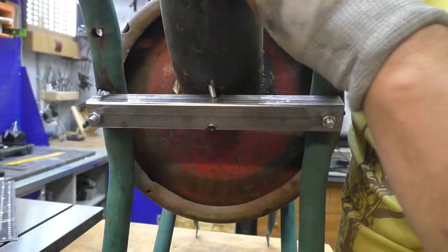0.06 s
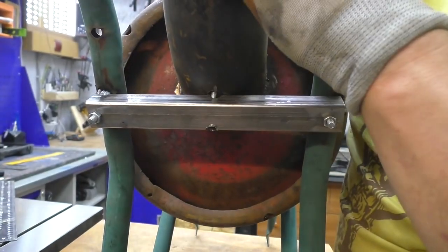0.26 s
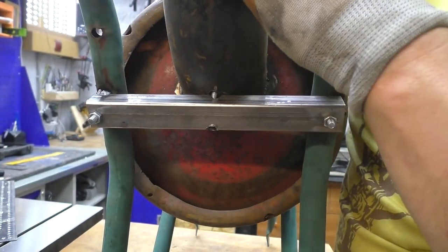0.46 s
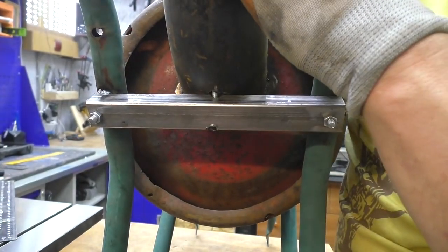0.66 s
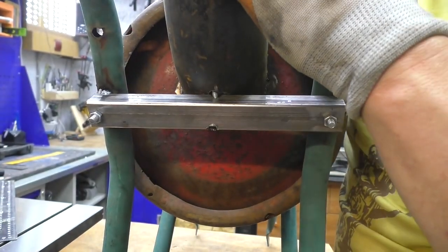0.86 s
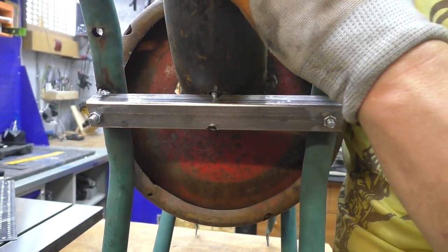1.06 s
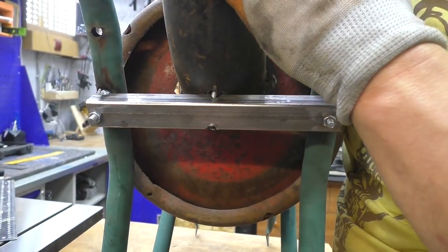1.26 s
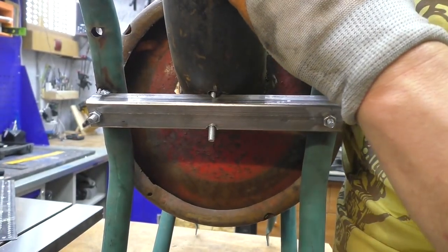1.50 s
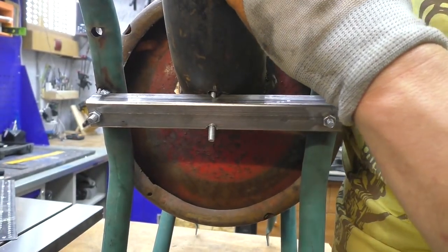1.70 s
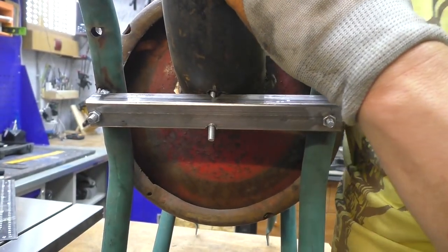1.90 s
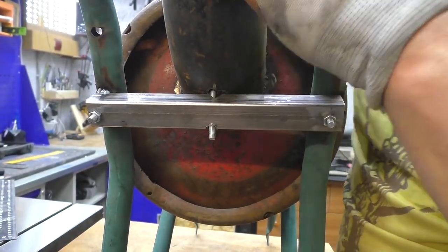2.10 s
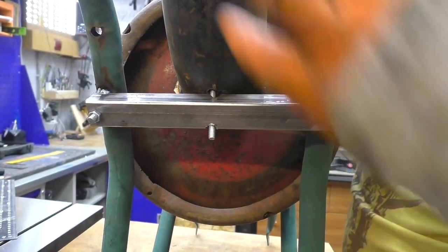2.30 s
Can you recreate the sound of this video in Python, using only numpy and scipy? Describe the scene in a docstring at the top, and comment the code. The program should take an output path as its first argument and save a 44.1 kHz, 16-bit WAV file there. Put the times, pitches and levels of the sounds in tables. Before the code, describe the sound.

Close metal clinking in a workshop: after a few hollow booms from a shifted drum, a steel pin chatters, scrapes and briefly squeaks in a ringing bar, landing with a bright clink. Soft low bumps and glove rustle finish.

```python
"""Low booms, then steel rattling and scraping up to a bright clink, close by in a workshop.
A gloved hand works a steel pin through a bar on a steel frame that holds a large drum.
The drum booms as it is shifted; the pin chatters in its hole, scrapes along it and drops home.
Each contact rings the pin briefly and the bar and frame for longer."""
import sys
import numpy as np
from scipy import signal
from scipy.fft import rfft, irfft, next_fast_len
from scipy.io import wavfile
from scipy.ndimage import uniform_filter1d

SR = 44100
rng = np.random.default_rng(int(sys.argv[2]) if len(sys.argv) > 2 else 0)


def materialize(psi):
    """Save the field psi as 16-bit PCM at rate SR to the path in sys.argv[1].

    A 1-D psi becomes a single channel; in a 2-D psi each row is a channel.
    """
    bounded = np.clip(np.atleast_2d(psi).T, -1, 1)
    quanta = np.round(bounded * 32767).astype(np.int16)
    wavfile.write(sys.argv[1], SR, quanta)


N = 108045
T = np.arange(round(SR * .6)) / SR  # seconds since one event began
BRIEF = T[:len(T) // 6]  # its first 0.1 s
SLIPS_PER_S, CRACK_T60, BOOM_RISE_S = 3000, 0.011, .0035  # a t60 is the seconds taken to fade by 60 dB

# pin contacts: t/s, pin level/dB, frame level/dB, bar level/dB, brightness/(dB per octave),
# chatter time/s, pin's lowest note/Hz, clank boost/dB
CLINKS = [(.199, -31, -42, -47.5, -7, 0.0032, 2530, -7), (0.281, -51, -40, -54, -0.5, 0.0033, 2510, -2),
          (.295, -29, -40, -46, -3, 0.0077, 2600, 3.5), (.462, -45, -52, -51.5, -6.5, 0.0044, 2490, -2.5),
          (.606, -37, -51.5, -53, -7, 0.0021, 3400, 1.5), (.673, -23, -34, -39, -3, 0.0058, 2474, 6),
          (0.9911, -35, -46.5, -52, -6, 0.0014, 2340, -2),
          (1.016, -20.5, -35.5, -42, -1, 0.0047, 2690, 4.5), (1.037, -17.5, -32, -37.5, 1, 0.0067, 2750, 1),
          (1.058, -24.5, -31, -37.5, -1.5, 0.0041, 2560, 3), (1.066, -21, -37, -39, -1, 0.0044, 2780, 5),
          (1.142, -30.5, -43, -39.5, -5, 0.0062, 2720, -1),
          (1.209, -28, -44.5, -48.5, -3.5, .0011, 2535, 1), (1.323, -26, -41.5, -50, -6.5, 0.0065, 2630, 3),
          (1.3327, -13, -35.5, -31, 1.5, 0.0023, 2790, 1), (1.435, -28.5, -31, -43, -2.5, .0045, 2520, -5),
          (1.4858, -19.5, -34, -47, -.5, 0.0028, 3514, 5),
          (1.4903, -16.5, -30.5, -33, -0.5, 0.0042, 2620, 4), (1.535, -33.5, -34, -46, -0.5, .013, 2560, 0),
          (1.63, -32.5, -42, -55, -2.5, 0.007, 2585, 4), (1.657, -35, -45.5, -46, -6, 0.0065, 2590, 4),
          (1.7933, -13.5, -33, -34, 3, 0.0036, 2640, -8.5), (2.019, -45.5, -50, -57, -9.5, .0057, 2560, -7),
          (2.04, -39.5, -46, -74, -7, 0.0031, 2620, 5), (2.202, -45, -49.5, -64, -6.5, 0.0038, 2570, 3.5)]
# the pin sliding in its hole: t/s, length/s, first level/dB, last level/dB
SCRAPES = [(0.197, 0.071, -33, -43.5), (0.687, 0.027, -39, -32), (1.092, 0.064, -42, -34.5),
           (1.284, 0.045, -34.5, -23.5), (1.35, 0.1, -38.5, -48), (1.441, .035, -28, -27.5),
           (1.519, 0.22, -45, -48.5), (2.022, 0.016, -39, -51)]
# the pin's upper modes (notes it rings at by itself): f/Hz, level/dB, t60/s
PIN_MODES = [(3100, -8, .06), (5175, -14, .06), (5710, -1.5, .06), (5880, -9, .03), (6330, -9, .08),
             (6530, -10, .06), (7240, -13, .08), (8940, -8, .07), (9040, -7, .05), (9400, -9, .04),
             (10780, -12, .06)]


def amp(db):
    """Turn decibels into a gain."""
    return 10 ** (np.asarray(db) / 20)


def unit(x):
    """Scale x to an average (rms) level of 1."""
    return x / np.sqrt(np.mean(x ** 2) + 1e-20)


def along(points, hz):
    """Read between (f/Hz, value) points on a log-frequency axis."""
    f, v = np.transpose(points)
    return np.interp(np.log(hz + 1), np.log(f + 1), v)


def bell(hz, centre_hz, octaves):
    """A hump of height 1 on a log-frequency axis."""
    return np.exp(-(np.log2((hz + 1) / centre_hz) / octaves) ** 2)


def filtered(x, response):
    """Scale each frequency in x by response(hz)."""
    n = x.shape[-1]
    padded = next_fast_len(n + 2048, True)
    return irfft(rfft(x, padded) * response(np.fft.rfftfreq(padded, 1 / SR)), padded)[..., :n]


def noise(spectrum, size):
    """Noise shaped by (f/Hz, level/dB) points, at an average level of 1."""
    return unit(filtered(rng.standard_normal(size), lambda hz: amp(along(spectrum, hz))))


def wide(spectrum, width, size):
    """Shaped stereo noise; at width 0 both ears hear the same."""
    return noise(spectrum, size) + width * np.array([[1], [-1]]) * noise(spectrum, size)


def noise_pieces(spectrum, width, count, size):
    """Random stretches of shaped stereo noise."""
    source = wide(spectrum, width, size=N)
    starts = rng.integers(0, N - size, count)
    return source[:, starts[:, None] + np.arange(size)].swapaxes(0, 1)


def fade(t60, t=T):
    """Die away by 60 dB every t60 seconds."""
    return np.exp(-np.log(1000) * t / np.abs(t60))


def ring(modes, scatter_db, count, t=T):
    """Fading notes, each struck a little harder or softer at every blow; one row a blow."""
    hz, db, t60 = np.transpose(modes)
    gains = amp(db + scatter_db * rng.standard_normal((count, len(hz))))
    return gains @ (fade(t60[:, None], t) * np.sin(2 * np.pi * hz[:, None] * t))


def add(out, s, x):
    """Mix x into out, starting at s seconds."""
    i = max(round(s * SR), 0)
    out[..., i:i + x.shape[-1]] += x[..., :N - i]


def slips(per_s, size):
    """Tiny contacts at random times and strengths."""
    return (rng.random(size) < per_s / SR) * rng.standard_normal(size)


def air():
    """The workshop's steady low hush, widest in the bass."""
    spectrum = [(20, -10), (40, -5), (130, -6.5), (270, 4.5), (600, -15), (1200, -3.5), (2500, -13.5),
                (5000, -20.5), (16000, -24.5)]  # tone of the hush: f/Hz, level/dB
    widths = [(80, 1), (200, 0.38), (1000, 0.38), (10000, 0.22)]  # how unlike the two ears are: f/Hz, width
    side = filtered(noise(spectrum, size=N), lambda hz: along(widths, hz))
    return noise(spectrum, size=N) + np.array([side, -side])


def room(x):
    """The workshop answers with a short blur of echoes."""
    tail = rng.standard_normal((2, len(T))) * fade(t60=0.29) * (T > .004)
    return signal.fftconvolve(x, tail / np.linalg.norm(tail[0]), axes=1)[:, :N]


def glove():
    """Knitted cloth brushes the steel in short grainy strokes."""
    brushes = [(0.03, 0.12, -45.5), (0.054, 0.026, -47), (0.106, 0.043, -46), (0.137, 0.13, -46),
               (0.532, 0.11, -53), (0.606, 0.16, -44.5), (0.792, 0.2, -50), (2.042, 0.17, -49.5),
               (2.181, 0.085, -45.5), (2.257, 0.059, -44.5)]  # strokes of the glove: t/s, length/s, level/dB
    spectrum = [(200, 15.5), (700, 3.5), (1300, 2), (3500, 7), (6000, 1.5), (10000, 3.5), (16000, 1.5)]  # tone of the cloth: f/Hz, level/dB
    strokes = np.zeros(N)
    for s, length, db in brushes:
        add(strokes, s, amp(db) * np.sin(np.pi * T[T < length] / length))
    grain_db = 2.8 * unit(uniform_filter1d(rng.standard_normal(N), size=90))
    return strokes * unit(amp(grain_db)) * wide(spectrum, width=0.12, size=N)


def squeaks():
    """Steel sticks and slips on one wavering note."""
    notes = [(0.601, 0.074, 1807, -44), (.676, 0.056, 2497, -30), (1.348, 0.081, 2420, -34.5),
             (2.274, 0.096, 1772, -48.5), (2.369, 0.077, 3820, -54)]  # thin squeaks: t/s, length/s, f/Hz, level/dB
    out = np.zeros(N)
    for s, length, hz, db in notes:
        waver = 0.01 * unit(uniform_filter1d(rng.standard_normal(len(T)), size=150))
        swell = np.abs(np.sin(np.pi * np.minimum(T / length, 1))) ** 0.12
        add(out, s, amp(db) * swell * np.sin(2 * np.pi * np.cumsum(hz * (1 + waver)) / SR))
    return out


def bump():
    """A dull low bump that sags in pitch as the hand lets go."""
    start_hz, sag_hz_per_s = 174.5, 295
    out = np.zeros(N)
    phase = 2 * np.pi * np.cumsum(start_hz - sag_hz_per_s * T) / SR
    rise = 1 - np.exp(-T / BOOM_RISE_S)
    add(out, s=2.196, x=amp(-33.5) * np.sin(phase) * fade(t60=0.26) * rise)
    return out


def booms():
    """Soft heavy knocks: a thud and the drum's low notes, which die sooner while the hand leans on it."""
    knocks = [(.035, -51, -45, .4), (.126, -37, -36.5, 0.52), (.202, -25.5, -25.5, 0.45),
              (0.2253, -24.5, -22, 0.38), (0.2957, -17, -18, 0.53), (.465, -32, -34, 0.31),
              (.674, -34.5, -38.5, 0.46), (1.018, -44, -46.5, .7), (1.441, -39.5, -48.5, 0.86),
              (2.025, -34, -43, 0.19), (2.0514, -30, -46, 0.14), (2.0743, -27.5, -46, .15),
              (2.1013, -30.5, -39.5, 0.37)]  # the drum hitting its frame: t/s, ring level/dB, thud level/dB, t60/s
    drum_modes = [(134, -14, .8), (218, -15, .7), (259, 0, 1), (273, -11, .8), (289, -12, .7),
                  (312, -16, 1.5), (394, -21, 1), (474, -29, 1.2), (716, -31, 1.8)]  # the drum's notes: f/Hz, level/dB, multiple of the knock's t60
    spectrum = [(30, -25), (80, -26), (140, -4), (200, -11.5), (270, 3.5), (350, -9.5), (550, -23),
                (900, -32.5), (3000, -52)]  # tone of the thud: f/Hz, level/dB
    out = np.zeros((2, N))
    thud_fade = fade(t60=0.23)
    rise = 1 - np.exp(-T / BOOM_RISE_S)
    thuds = noise_pieces(spectrum, width=0.19, count=len(knocks), size=len(T)) * thud_fade
    for (s, ring_db, thud_db, t60), thud in zip(knocks, thuds):
        hum = ring([(hz, db, life * t60) for hz, db, life in drum_modes], scatter_db=1, count=1)
        add(out, s, (amp(ring_db) * hum + amp(thud_db) * unit(thud) * np.std(thud_fade)) * rise)
    return out * amp([[-1.35], [1.35]])  # a little to the right


def frame_rings(count, n_modes):
    """The frame's many notes, in a new mix for each contact, over a wash too dense to pick apart."""
    spectrum = [(200, -32.5), (450, -13), (750, -18), (1170, -2.5), (1950, -3.5), (2550, 1), (2900, -1.5),
                (3500, 0), (4900, -2.5), (6300, -1.5), (7500, -5), (9500, -7), (12000, -8.5), (16000, -28)]  # tone of the frame: f/Hz, level/dB
    ring_times = [(300, 1), (1500, 0.55), (4000, 0.43), (8000, 0.28), (15000, 0.099)]  # how long the frame rings: f/Hz, t60/s
    width, scatter_db = 0.27, 8.5
    hz = 300 + 16000 * ((np.arange(n_modes) + rng.random(n_modes)) / n_modes) ** 1.4
    level_db = along(spectrum, hz) + scatter_db * np.clip(rng.standard_normal(n_modes), -2, 1)
    gain = amp(level_db) * hz ** (1 / 7)  # makes up for high notes lying farther apart
    t = np.float32(T)
    phase = np.float32(2 * np.pi * hz)[:, None] * t
    decay = np.exp(np.float32(-np.log(1000) / along(ring_times, hz))[:, None] * t)
    waves = np.concatenate([decay * np.sin(phase), decay * np.cos(phase)])
    mix = rng.standard_normal((count, 2, 2, n_modes)) * gain / np.linalg.norm(gain)
    stereo_mix = np.float32(mix[:, :1] + width * mix[:, 1:] * np.array([1, -1])[:, None, None])
    notes = stereo_mix.reshape(count * 2, -1) @ waves
    wash = fade(t60=0.38) * noise_pieces(spectrum, width, count, size=len(T))
    return notes.reshape(count, 2, -1) + amp(-7.5) * wash


def bar_rings(count):
    """The struck steel bar rings with clear notes; one row a contact."""
    bar_modes = [(716, -17, .8), (1170, -10, .22), (1240, -12, .33), (1368, -24, .5), (1514, -13, .45),
                 (1650, -12, .45), (1725, -13, .4), (2156, -12, .45), (2398, -9, .45), (2505, -2, .25),
                 (3088, 0, .45), (3495, -5, .3), (3546, -7, .28), (3818, -9, .45), (4060, -9, .3),
                 (4138, -11, .45), (4817, -18, .5), (5706, -1.5, .33), (6325, -10, .33), (6520, -10, .25),
                 (7245, -12, .3), (8960, -11, .18), (9490, -11, .2), (9973, -15, .3), (10770, -14, .22)]  # the bar's notes: f/Hz, level/dB, t60/s
    return ring(bar_modes, scatter_db=3, count=count)


def settle():
    """After dropping home the loose pin shivers in its hole: a fine, high rattle."""
    length_s = .13
    out = np.zeros(N)
    shiver = slips(SLIPS_PER_S, size=len(T)) * np.sin(np.pi * np.minimum(T / length_s, 1))
    tick = ring([(hz, 0, CRACK_T60) for hz, _, _ in PIN_MODES], scatter_db=2, count=1)[0]
    ticks = signal.fftconvolve(shiver, tick)[:len(T)]
    rattle = filtered(ticks, lambda hz: bell(hz, centre_hz=5900, octaves=0.44))
    add(out, s=1.815, x=amp(-44) * unit(rattle) * np.sqrt(length_s / T[-1]))
    return out


def scrapes(frames):
    """Many tiny slips shake the pin held against the bar; bar and frame ring in answer."""
    peaks = [(1183, 50, 3.5), (1521, 32, 1), (1658, 27, 4.5), (2500, 14, 5.5), (2530, 87, 6.5),
             (3854, 34, -3)]  # notes of the bar the pin rubs against: f/Hz, width/Hz, level/dB

    def bar_notes(hz):
        """The rasp is loudest near the bar's notes."""
        return sum((-1) ** k * amp(db) * 1j * hz * width / (centre ** 2 - hz ** 2 + 1j * hz * width)
                   for k, (centre, width, db) in enumerate(peaks))

    out = np.zeros((2, N))
    forces = []
    for _, length, first_db, last_db in SCRAPES:
        pressure = amp(np.interp(T, [0, length], [first_db, last_db])) * (T < length)
        forces.append(unit(slips(SLIPS_PER_S, size=len(T))) * pressure)
    for (s, *_), force, frame, bar in zip(SCRAPES, forces, frames, bar_rings(len(SCRAPES))):
        rasp = filtered(force, bar_notes)
        answer = amp(-19) * unit(frame) + amp(-9.5) * unit(bar)
        tail = signal.fftconvolve(force[None], answer, axes=1)[:, :len(T)]
        add(out, s, np.std(force) * (unit(rasp) + np.std(answer) * unit(tail)))
    return out


def pin_strike(chatter_s, low_hz, crack):
    """A hit and its chatter make the pin ping and crackle; its lowest note shifts with the grip."""
    contact = 0.22 * slips(per_s=2400, size=len(BRIEF)) * np.exp(-(BRIEF / chatter_s) ** 2)
    contact[0] = 1  # the first hit
    notes = ring([(low_hz, 8, .04)] + PIN_MODES, scatter_db=4.5, count=1, t=BRIEF)[0]
    ping = signal.fftconvolve(contact, notes)[:len(BRIEF)]
    grit_power = signal.fftconvolve(np.abs(contact), fade(CRACK_T60, BRIEF) ** 2)[:len(BRIEF)]
    grit = crack * np.sqrt(np.abs(grit_power))
    pin = unit(ping) + amp(-2.5) * unit(grit)
    return pin / np.linalg.norm(pin[0]) * np.sqrt(SR * (chatter_s + 0.0003))  # longer means more energy


def clinks(frames):
    """The pin strikes; bar and frame ring on, clanking more or less by where they are hit."""
    spectrum = [(300, -7), (700, -13.5), (1200, 0.5), (3500, 0.5), (7000, 4), (10500, 1.5), (16000, -18)]  # tone of the contact's crack: f/Hz, level/dB
    low_cut_hz = 710  # the contacts give little sound below this
    out = np.zeros((2, N))
    bars = bar_rings(len(CLINKS))
    cracks = noise_pieces(spectrum, width=0.18, count=len(CLINKS), size=len(BRIEF))
    for clink, frame, bar, crack in zip(CLINKS, frames, bars, cracks):
        s, pin_db, frame_db, bar_db, db_per_octave, chatter_s, low_hz, clank_db = clink

        def tone(hz):
            """This contact's brightness and clank, with the bass cut away."""
            tilt_db = db_per_octave * np.log2(np.clip(hz, 1100, 10000) / 3800)
            hump_db = clank_db * bell(hz, centre_hz=3740, octaves=0.19)
            return amp(tilt_db + hump_db) * hz ** 2 / np.hypot(hz ** 2, low_cut_hz ** 2)

        rise = 1 - np.exp(-2 * T / chatter_s)
        sound = (amp(bar_db) * bar + amp(frame_db) * frame) * rise
        sound[:, :len(BRIEF)] += amp(pin_db) * pin_strike(chatter_s, low_hz, crack)
        add(out, s, filtered(sound, tone))
    return out


def scene():
    """All sounds of the work, in the room, over its steady air."""
    frames = frame_rings(count=len(CLINKS) + len(SCRAPES), n_modes=300)
    steel = clinks(frames[:len(CLINKS)]) + scrapes(frames[len(CLINKS):]) + settle()
    work = steel + booms() + bump() + squeaks() + glove()
    return work + amp(-12.5) * room(work) + amp(-53) * air()


def record(dry):
    """Round off the loudest peaks and cut the very highest treble."""
    ceiling_db, top_hz = -.5, 16200
    rounded = dry / (1 + np.abs(dry / amp(ceiling_db)) ** 10) ** (1 / 10)
    return filtered(rounded, lambda hz: hz < top_hz)


dry = scene()
out = record(dry)
materialize(out)
```